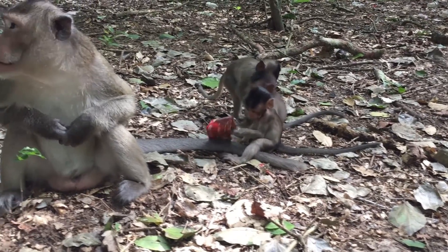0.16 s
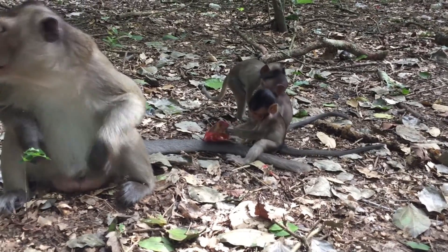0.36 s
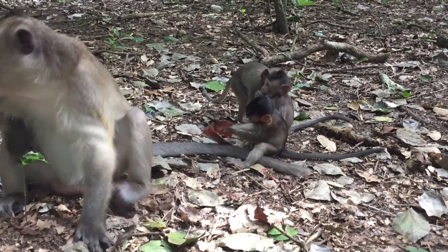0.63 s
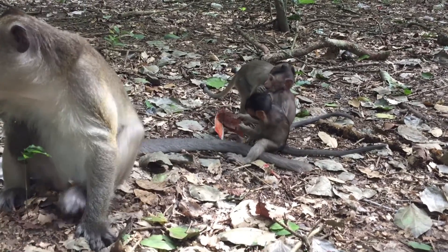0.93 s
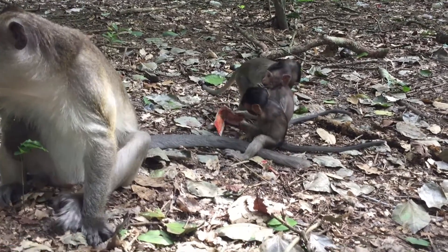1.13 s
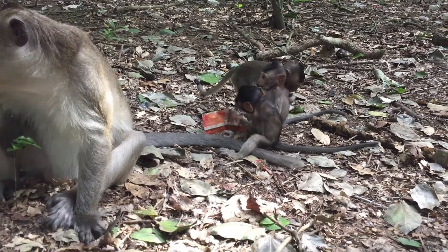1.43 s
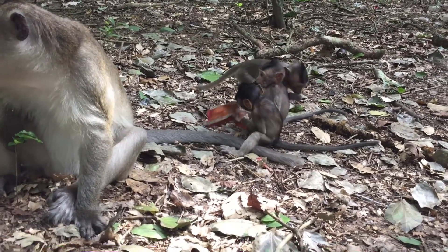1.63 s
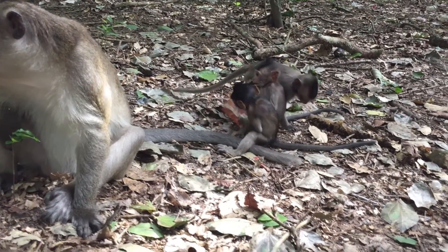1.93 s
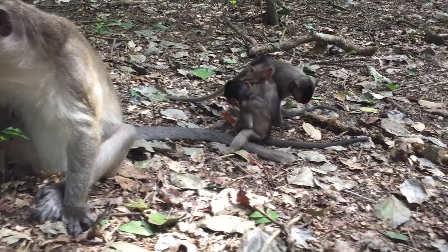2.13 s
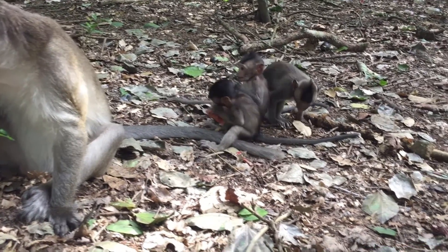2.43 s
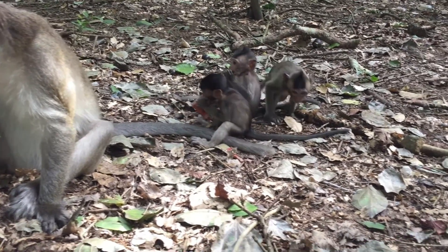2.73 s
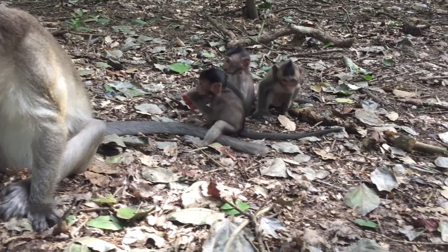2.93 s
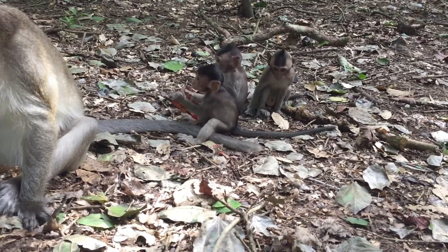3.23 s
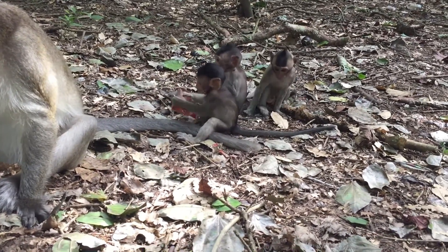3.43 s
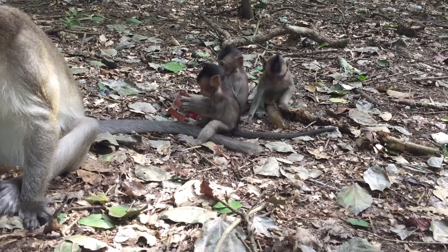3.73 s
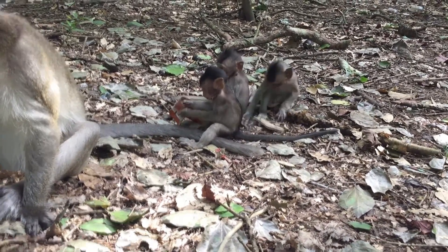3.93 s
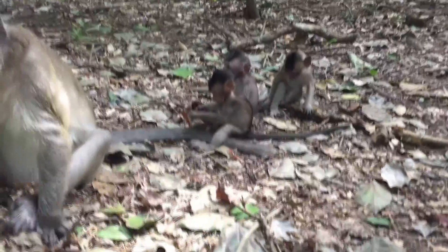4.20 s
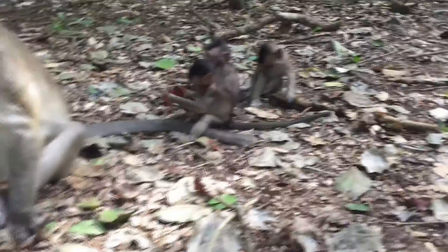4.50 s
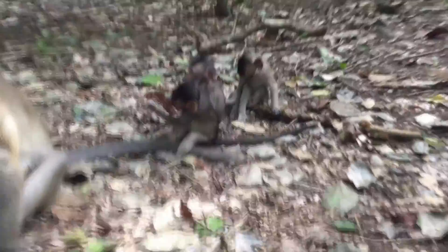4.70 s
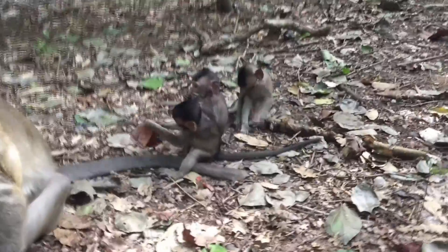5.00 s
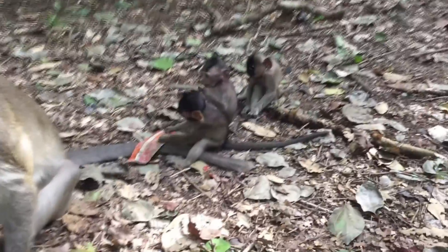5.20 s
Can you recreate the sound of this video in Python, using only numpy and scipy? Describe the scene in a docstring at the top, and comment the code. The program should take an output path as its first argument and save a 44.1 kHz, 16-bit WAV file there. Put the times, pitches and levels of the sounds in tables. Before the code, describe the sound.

Dry leaves rustle and snap under small monkeys, hard knocks on the camera dominate early, one short squeak follows, over low wind rumble.

```python
"""Young monkeys in dry leaves

Young monkeys play on a forest floor, a couple of metres from a hand-held camera. Random fractures,
coloured like dry litter, rustle and snap under them; one gives a short arched squeak built from harmonics.
Noisy contact forces ring the modes of the camera's body as sharp knocks, one of them standing for a twig
knock, and shaped noise makes soft bumps. Light wind rumbles on the microphone as unsteady low noise,
over a faint hush."""
import sys
import numpy as np
from scipy import signal
from scipy.fft import rfft, irfft
from scipy.io import wavfile
from scipy.ndimage import uniform_filter1d

SR = 44100
rng = np.random.default_rng(int(sys.argv[2]) if len(sys.argv) > 2 else 0)


def to_wav(sig):
    """Store sig (one row per channel, or 1-D mono) as 16-bit WAV at the path in sys.argv[1].

    Samples outside -1..1 are clipped; the rate is SR.
    """
    pcm = np.clip(np.atleast_2d(sig), -1, 1) * 32767
    pcm = np.round(pcm).astype(np.int16)
    wavfile.write(sys.argv[1], SR, pcm.T)  # frames by channels


N = 236133
TIME = np.arange(N) / SR
AGE = np.arange(SR // 2) / SR  # seconds since a blow

# Wind on the microphone. Each row: frequency in Hz, relative level in dB.
WIND_SPECTRUM = [(20, -31), (32, -25.5), (48, -4), (72, 1.5), (100, -2), (135, -9.5), (190, -15.5),
                 (260, -25.5), (400, -33.5), (800, -134.5)]
# Hush of the still forest. Each row: frequency in Hz, relative level in dB.
HUSH_SPECTRUM = [(200, -2.5), (400, -1.5), (700, -3.5), (1100, -4), (1600, -6), (2500, -8), (4000, -10.5),
                 (6500, -15), (9500, -18), (11000, -20), (16000, -21.5)]
# Level of the low wind rumble, wandering a little by chance. Each row: time in seconds, relative level in dB.
RUMBLE_LEVELS = [(0.0, -52.5), (2.1, -53.5), (2.7, -57.5), (3.03, -51.5), (3.5, -57), (3.95, -52.5),
                 (4.25, -57), (4.5, -52), (4.8, -55.5), (5.35, -54.5)]
# Soft bumps of the hand. Each row: start in seconds, low thump in dB, hollow knock in dB, t60 in seconds.
BUMPS = [(.305, -57, -53.5, .08), (.373, -66, -37.5, 0.054), (2.028, -58, -51, 0.075),
         (4.038, -47, -52.5, 0.24), (4.086, -44.5, -48, 0.051), (4.729, -30.5, -38, 0.04),
         (4.751, -45.5, -55, 0.15), (4.811, -67, -54.5, 0.26)]
# Hollow ring of a bump, before softening. Each row: frequency in Hz, relative level in dB.
HOLLOW_SPECTRUM = [(100, 1), (260, -3), (400, 4), (520, 2), (660, -13.5), (840, -2.5), (1020, -27),
                   (1600, -17.5), (2300, -25.5), (3000, -37), (9000, -20)]
# Sharp knocks, nearly all on the camera; the one at 1.55 s is a twig knock played through the same modes.
# Each row: start in seconds, thud in dB, clack in dB, contact hardness (treble limit) in Hz,
# pitch favoured by the spot struck in Hz, pitch muted by it in Hz, contact length in seconds,
# wash level in dB relative to the clack.
KNOCKS = [(1.0573, -28, -30, 4560, 1250, 1900, 0.0036, -18),
          (1.1768, -22, -19, 12000, 1390, 2180, 0.0042, -16.5),
          (1.261, -33, -34, 1350, 676, 1240, 0.0049, -25),
          (1.2825, -24.5, -25.5, 3670, 640, 1160, 0.0045, -20.5),
          (1.479, -48.5, -46.5, 1100, 1180, 1990, 0.0044, -17.5),
          (1.5541, -43, -29.5, 2300, 2250, 1200, 0.0024, -22),
          (1.891, -37, -27.5, 6440, 2400, 654, 0.00033, -16.5),
          (1.902, -22.5, -16, 9000, 1720, 3600, 0.0062, -17.5)]
# Ringing modes of the camera's case. Each row: frequency in Hz, t60 in seconds, relative level in dB.
CASE_MODES = [(288, 0.038, -28.5), (416, 0.025, -24.5), (538, 0.012, -10), (697, 0.045, -8),
              (839.5, .022, -7), (1242, 0.0066, -4.5), (1358, 0.0085, 4.5), (1540, 0.0082, -6.5),
              (2140, 0.013, -4.5), (2293, 0.014, -8), (2494, .014, -9.5), (3730, 0.018, -15),
              (4110, 0.019, -15), (5350, 0.011, -1.5), (5670, 0.03, -22), (8160, 0.0053, -29),
              (9060, 0.018, -6.5), (11500, 0.0037, -6), (14000, 0.0023, 1)]
# Low modes of the camera rocking in the hand. Each row: frequency in Hz, t60 in seconds, relative level in dB.
THUD_MODES = [(204, 0.15, -2.5), (281.5, 0.03, -3), (365, 0.046, -9)]
# Colour of the wash after a knock. Each row: frequency in Hz, relative level in dB.
WASH_SPECTRUM = [(150, -22), (300, -7.5), (900, -4), (1350, 1.5), (1900, -1), (3700, -2.5), (6000, -7),
                 (9000, -13), (16000, -17.5)]
# An animal shifts its weight in the litter. Each row: start in seconds, time to press down in seconds,
# level in dB before the fine and coarse balance, t60 of the settling in seconds.
RUSTLES = [(0.0, 0.0059, -55, 0.27), (.05, .015, -57, 0.24), (0.519, 0.075, -46, 1),
           (0.858, 0.11, -57, 0.37), (2.604, 0.0056, -59, 0.16), (3.169, 0.019, -54.5, 0.27),
           (3.321, 0.016, -55.5, 0.16), (4.95, 0.062, -60.5, 0.21), (5.115, 0.035, -53, 0.26)]
# Colour of the crackling litter. Each row: frequency in Hz, relative level in dB.
LITTER_SPECTRUM = [(290, -28), (500, 4.5), (855, -12), (933, -6.5), (1080, -7.5), (2540, -2), (5020, -5),
                   (6420, -4.5), (11800, -9.5), (16000, -15)]
# Brittle twigs and stalks snapping. Each row: start in seconds, level in dB, centre in Hz,
# crisp treble in dB relative to the body.
SNAPS = [(.067, -64.5, 6300, 17), (.196, -57.5, 6350, -1), (.340, -50.5, 4600, 0.5),
         (.592, -41.5, 5850, -19), (.635, -43.5, 2840, 3), (0.799, -54, 7660, -4), (1.535, -45, 4380, -2),
         (1.610, -51, 3120, -7), (1.646, -52, 3130, -6), (1.695, -53.5, 3840, 4.5), (1.711, -59, 5130, 7.5),
         (1.82, -62, 5200, 10.5), (1.887, -47.5, 3500, 2.5), (2.609, -45.5, 3100, -7.5),
         (3.01, -41.5, 3330, -2), (3.030, -48.5, 3750, -6), (3.309, -41, 3630, -8.5),
         (3.315, -49, 3230, 1.5), (3.349, -55, 3290, 0), (4.342, -61.5, 3400, -1)]
# Whole leaves crunching under a hand or foot, slower and duller than a snap.
# Each row: start in seconds, level in dB, centre in Hz.
CRUNCHES = [(0.031, -51, 1910), (.105, -53, 2300), (0.614, -44.5, 2230), (1.472, -50.5, 3920),
            (2.03, -45, 3650), (2.055, -51, 3840), (2.126, -55.5, 3500), (2.98, -54.5, 3020),
            (3.182, -53, 3300), (4.174, -59.5, 5140), (4.839, -55.5, 3120), (4.899, -52, 2930),
            (4.923, -54.5, 3640), (5.131, -53, 2360)]
# Crisp edge of a snap or crunch. Each row: frequency in Hz, relative level in dB.
CRISP_SPECTRUM = [(400, -10.5), (1300, -3), (2200, -9.5), (7500, -0.5), (11000, -5.5), (16000, -14.5)]
# The small throat and mouth. Each row: frequency in Hz, gain in dB.
THROAT_SPECTRUM = [(900, 6), (1900, -9), (2800, -5.5), (4000, -4), (4500, -6.5), (5000, -40), (6000, -19),
                   (7000, -37), (8100, -13), (9000, -21), (9900, -19), (11000, -18), (12000, -34),
                   (15000, -37)]

WIND_DB, HUSH_DB = -49.5, -68
SOFT_HAND_HZ = 3500  # a bump holds little above this
REBOUND_S = .00052
# fine and coarse crackle relative to a rustle; the constant patter
CRUSH_DB, COARSE_DB, PATTER_DB = -5.5, -10.5, -76.5
CRUSH_PER_S, COARSE_PER_S, PATTER_PER_S = 1800, 77, 180  # mean fractures in each size of leaf
SNAP_S, CRUNCH_S = .002, .007  # length of the break
CRUNCH_TREBLE_DB = -11  # relative to the body
CRUMB_DB, CRUMB_T60_S = -11.5, 0.09  # the crumbling after every break
# one arch of effort: the pitch climbs from its foot to the top and falls back
SQUEAK_START_S, SQUEAK_RISE_S, SQUEAK_FALL_S = 3.621, 0.092, 0.06
SQUEAK_FOOT_HZ, SQUEAK_TOP_HZ, ARCH_SHAPE = 871, 1006, 1.25
SQUEAK_DB, SQUEAK_ATTACK_S, SQUEAK_RELEASE_S = -45.5, .022, 0.06
RASP_DB, RASP_GLIDE_DB = -31, 14  # rasp on a steady pitch, and the gain added at the fastest glide
TOP_HZ = 16200


def undb(db):
    """Decibels to gain."""
    return 10 ** (np.asarray(db) / 20)


def unit(x):
    """Scale to rms 1."""
    return x / np.sqrt(np.mean(x ** 2))


def unit_attack(x):
    """Scale so that the loudest 2 ms have rms 1."""
    return x / np.sqrt(uniform_filter1d(x ** 2, size=88, mode="constant").max())


def fade(t60):
    """Exponential decay after a blow, down 60 dB at t60 seconds."""
    return np.exp(-np.log(1000) * AGE / t60)


def near(hz, centre, octaves):
    """1 at the centre frequency, falling to 0 away from it."""
    return np.exp(-(np.log2(hz / centre) / octaves) ** 2)


def gain_at(hz, spectrum):
    """Read the gain of a spectrum table on a log-frequency axis."""
    f, db = np.transpose(spectrum)
    return undb(np.interp(np.log(np.maximum(hz, 1)), np.log(f), db))


def colour(x, spectrum):
    """Filter a signal through a spectrum table and scale it to rms 1."""
    gain = gain_at(np.fft.rfftfreq(len(x), 1 / SR), spectrum)
    return unit(irfft(rfft(x) * gain, len(x)))


def butter(x, hz, kind, order=2):
    """Causal low-, high- or band-pass."""
    sos = signal.butter(order, np.minimum(hz, .47 * SR), kind, fs=SR, output="sos")
    return signal.sosfilt(sos, x)


def drift(rate):
    """Slow random wander at about this rate in Hz, at rms 1."""
    k = int(SR / rate)
    steps = np.repeat(rng.standard_normal(N // k + 1), k)
    smooth = uniform_filter1d(uniform_filter1d(steps, k), k)
    return unit(smooth[:N])


def add(out, t, x):
    """Mix a sound in at time t."""
    i = max(int(t * SR), 0)
    out[i:i + len(x)] += x[:N - i]


def chatter(length):
    """Force of a rough contact: a brief random flurry with a nearly even spectrum."""
    age = AGE[:1024]
    gate = np.exp(-(age / length) ** 4) * (1 - np.exp(-4 * age / length))
    force = rng.standard_normal(len(gate)) * gate
    # alternately flatten the spectrum and shorten the flurry again
    for _ in range(6):
        flat = irfft(np.exp(1j * np.angle(rfft(force))))
        force = flat * gate
    return np.pad(force, (0, len(AGE) - len(force)))


def crackle(count, rate, spread_db):
    """Random tiny fractures, most of them weak and a few strong."""
    hit = rng.random(count) < rate / SR
    sign = rng.choice([-1, 1], count)
    strength = np.minimum(rng.exponential(size=count), 3.5)
    return hit * sign * undb(spread_db * strength)


def wind():
    """Light wind and eddies rumble on the microphone over the hush of the forest."""
    level = unit(undb(np.interp(TIME, *np.transpose(RUMBLE_LEVELS))))
    eddies, breeze = undb(1.2 * drift(12)), undb(.4 * drift(3))
    rumble = colour(rng.standard_normal(N), WIND_SPECTRUM) * undb(WIND_DB) * level * eddies
    hush = colour(rng.standard_normal(N), HUSH_SPECTRUM) * undb(HUSH_DB) * breeze
    return rumble + hush


def bumps():
    """A soft hand pushes slowly, so only the low, hollow part of the case sounds."""
    out = np.zeros(N)
    for t, thump_db, hollow_db, t60 in BUMPS:
        push = fade(t60) * (1 - np.exp(-AGE / .003)) ** 2
        thump = unit_attack(np.sin(2 * np.pi * 190 * AGE) * push)
        hollow_noise = colour(rng.standard_normal(len(AGE)), HOLLOW_SPECTRUM)
        hollow = unit_attack(butter(hollow_noise, SOFT_HAND_HZ, "low") * push)
        add(out, t, undb(thump_db) * thump + undb(hollow_db) * hollow)
    return out


def camera_thud():
    """The whole camera rocks in the hand as a few decaying low modes."""
    thud = 0
    for k, (hz, t60, db) in enumerate(THUD_MODES):
        side = (-1) ** k  # neighbouring modes push the microphone in opposite directions
        thud += side * undb(db) * np.sin(2 * np.pi * hz * AGE) * fade(t60)
    return thud


def knocks():
    """A rough contact force rings the case modes over a low thud and leaves a fading, faintly ringing wash."""
    thud = camera_thud()
    out = np.zeros(N)
    for t, thud_db, clack_db, hard_hz, spot_hz, node_hz, length, wash_db in KNOCKS:
        case, linger = 0, 0
        for hz, t60, db in CASE_MODES:
            # the spot struck lies on the belly of some modes and on a node of others
            spot_db = 6 * near(hz, spot_hz, .42) - 11 * near(hz, node_hz, .25)
            case += undb(db + spot_db) * np.cos(2 * np.pi * hz * AGE) * fade(t60)
            linger += gain_at(hz, WASH_SPECTRUM) * np.sin(2 * np.pi * (hz * AGE + rng.random()))
        force = chatter(length)
        force += .3 * np.roll(force, int(REBOUND_S * SR))  # the quick rebound hollows the sound out
        ring = signal.fftconvolve(force, case)[:len(AGE)]
        ring -= .75 * butter(ring, [.87 * node_hz, 1.15 * node_hz], "band", order=1)
        clack = unit_attack(butter(ring, hard_hz, "low"))  # a softer contact loses the treble
        # the ringing dies first and leaves a diffuse, slightly rattling wash
        diffuse = colour(rng.standard_normal(len(AGE)), WASH_SPECTRUM)
        wash = diffuse + unit(linger) * fade(.5)
        rattle = undb(1.5 * drift(200)[:len(AGE)])
        wash = unit(butter(wash, 1.7 * hard_hz, "low") * rattle)
        # a quick decay over a slow one, with a soft onset
        wash *= (fade(0.12) + undb(-12.5) * fade(0.64)) * (1 - np.exp(-AGE / 0.00069))
        add(out, t, undb(thud_db) * thud + undb(clack_db) * (clack + undb(wash_db) * wash))
    return out


def leaves(rate):
    """Many leaves of different sizes, each size crackling in its own half octave."""
    total = np.zeros(N)
    for hz in 700 * 2 ** (np.arange(9) / 2):
        total += butter(crackle(N, rate, 4.5), [hz, hz * np.sqrt(2)], "band")
    return colour(total, LITTER_SPECTRUM)


def rustle():
    """Fractures swell as an animal presses down and die as the litter settles; the young patter faintly."""
    effort = np.zeros(N)
    for t, press, db, t60 in RUSTLES:
        pressing = np.clip((TIME - t) / press, 0, 1)
        settling = np.exp(-np.log(1000) * np.maximum(TIME - t - press, 0) / t60)
        effort += undb(db) * pressing * settling
    crush = leaves(CRUSH_PER_S) * undb(1.2 * drift(90))
    coarse = leaves(COARSE_PER_S)
    patter = leaves(PATTER_PER_S) * undb(2.5 * drift(9))
    return effort * (undb(CRUSH_DB) * crush + undb(COARSE_DB) * coarse) + undb(PATTER_DB) * patter


def fracture(db, hz, treble_db, length):
    """A leaf or twig breaks with a click or a short crunch at its own pitch, then crumbles a little."""
    crumbs = unit(crackle(len(AGE), 3000, 3.5))
    force = unit_attack(chatter(length)) + undb(CRUMB_DB) * crumbs * fade(CRUMB_T60_S)
    body = unit_attack(butter(force, [0.65 * hz, 1.27 * hz], "band"))
    edge = unit_attack(colour(force, CRISP_SPECTRUM))
    return undb(db) * (body + undb(treble_db) * edge)


def snaps():
    """Brittle stalks break in sharp snaps and whole leaves in duller, longer crunches under the animals."""
    out = np.zeros(N)
    for t, db, hz, treble_db in SNAPS:
        add(out, t, fracture(db, hz, treble_db, SNAP_S))
    for t, db, hz in CRUNCHES:
        add(out, t, fracture(db, hz, CRUNCH_TREBLE_DB, CRUNCH_S))
    return out


def squeak():
    """A clear arched coo: harmonics of an unsteady pitch through the throat, raspy where the pitch glides."""
    age, length = TIME - SQUEAK_START_S, SQUEAK_RISE_S + SQUEAK_FALL_S
    arch = np.interp(age, [0, SQUEAK_RISE_S, length], [0, np.pi / 2, np.pi])
    pitch = SQUEAK_FOOT_HZ + (SQUEAK_TOP_HZ - SQUEAK_FOOT_HZ) * np.sin(arch) ** ARCH_SHAPE
    attack = np.clip(age / SQUEAK_ATTACK_S, 0, 1)
    release = np.clip((length - age) / SQUEAK_RELEASE_S, 0, 1)
    jitter = .0025 * unit(butter(rng.standard_normal(N), 200, "low"))
    phase = 2 * np.pi * np.cumsum(pitch * (1 + jitter)) / SR
    voice = sum(gain_at(k * pitch, THROAT_SPECTRUM) * np.sin(k * phase) for k in range(1, 15))
    breath = unit(butter(rng.standard_normal(N), [7500, 11000], "band"))
    rasp = breath * (1 + np.cos(phase))  # pulses once in each cycle of the voice
    rasp_db = RASP_DB + RASP_GLIDE_DB * np.sin(2 * arch) ** 2
    return (unit(voice) + undb(rasp_db) * rasp) * undb(SQUEAK_DB) * attack * release


def forest(x):
    """Trunks and litter scatter a faint, short echo."""
    echo = butter(rng.standard_normal(len(AGE)), 6000, "low") * fade(0.13) * (1 - np.exp(-AGE / 0.0044))
    return x + undb(-28.0) * signal.fftconvolve(x, echo / np.linalg.norm(echo))[:N]


def scene():
    """The wind, the bumps and knocks, and the animals among the trees."""
    animals = forest(rustle() + snaps() + squeak())
    return (wind() + bumps() + knocks() + animals)[None]


def record(dry):
    """The camera cuts the top of the treble."""
    return signal.sosfilt(signal.ellip(8, .2, 70, TOP_HZ, fs=SR, output="sos"), dry)


dry = scene()
out = record(dry)
to_wav(out)
```